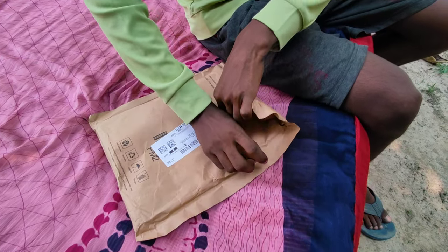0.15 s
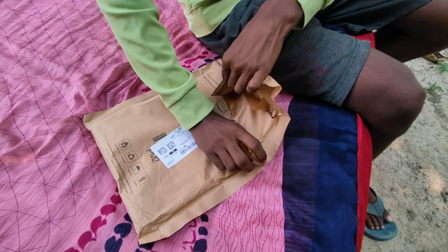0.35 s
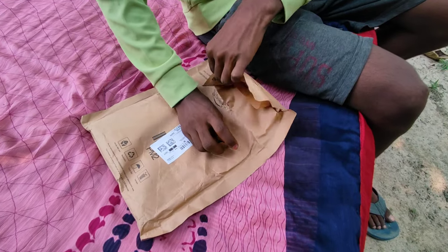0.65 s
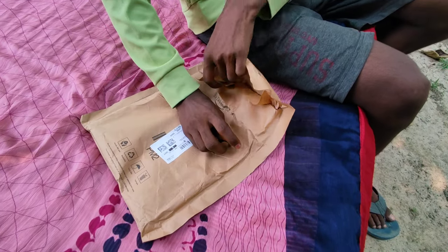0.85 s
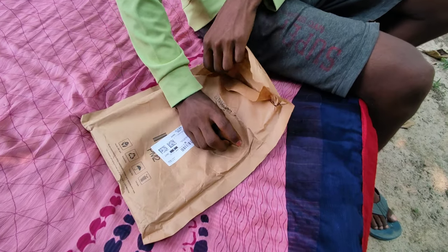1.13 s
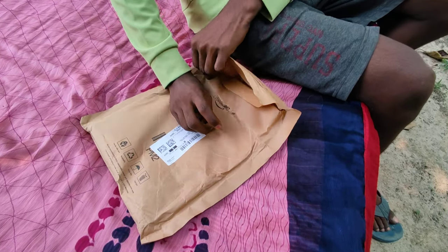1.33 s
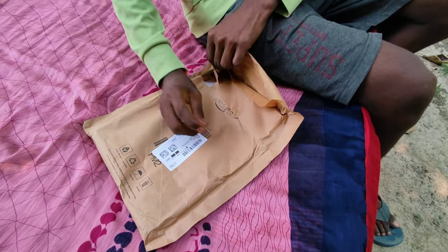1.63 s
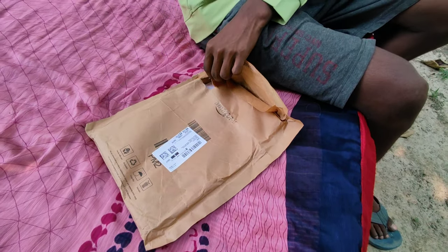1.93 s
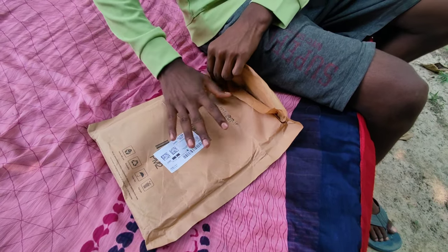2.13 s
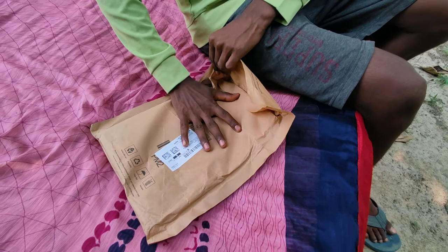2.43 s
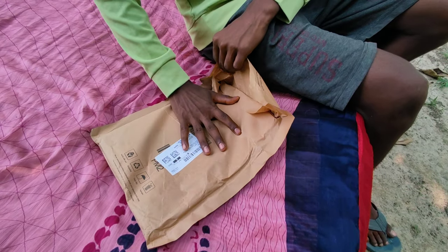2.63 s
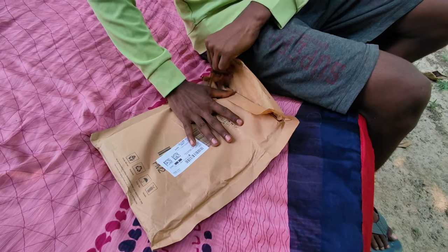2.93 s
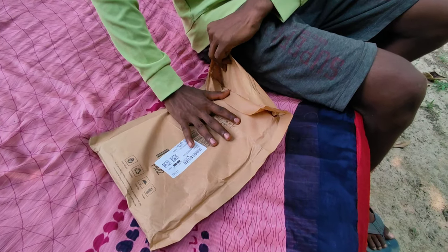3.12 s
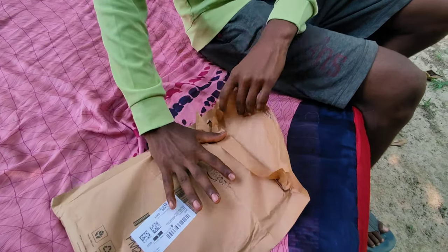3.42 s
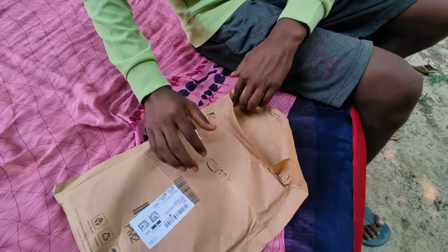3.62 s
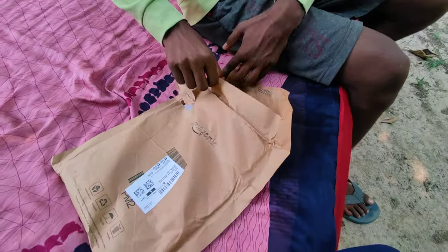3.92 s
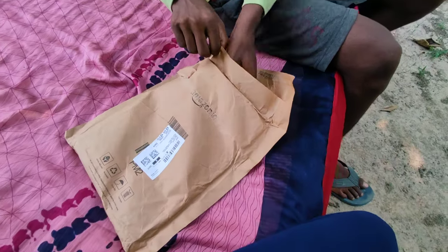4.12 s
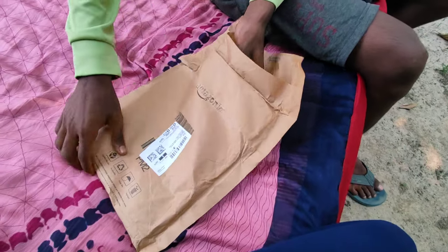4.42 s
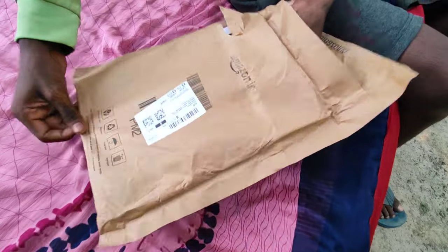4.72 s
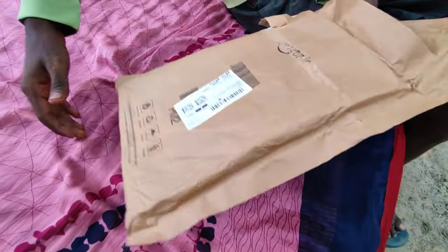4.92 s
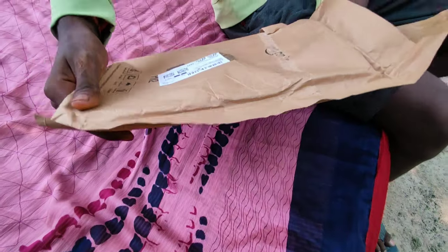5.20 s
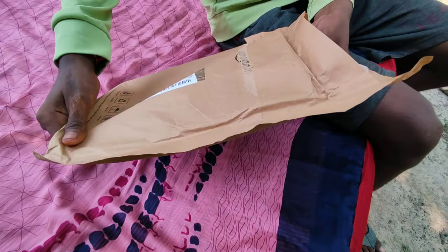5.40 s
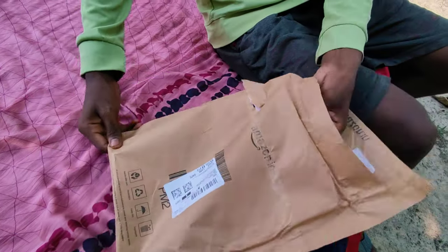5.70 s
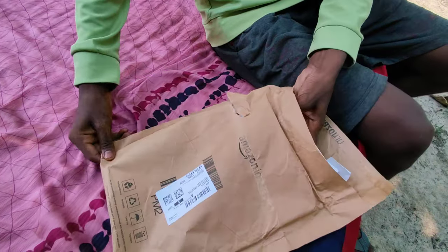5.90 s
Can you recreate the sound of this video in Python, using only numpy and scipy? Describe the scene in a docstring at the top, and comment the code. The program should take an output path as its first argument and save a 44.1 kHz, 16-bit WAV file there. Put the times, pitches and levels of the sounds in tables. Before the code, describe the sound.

Close stereo sound of a crisp paper envelope handled outdoors, over a very faint, steady low rumble. Light rubbing and small snaps start at once. From about 0.3 seconds the strip tears in short fibrous pulls, near 0.4, 0.75, 1.1 and 1.5 to 1.6, with a hollow drumming under the rips; the 1.1 pull is sharpest and ends in a bright tick. A last tiny tug comes near 1.7, then it is nearly quiet until about 2.25. Fingers press and rub the sheet from 2.3 to 3.4, crackling irregularly, with a firm snap and dull thump at 3.25. Creases cluster around 3.6, 4.0 and 4.3. From 4.6 to 5.7 the lifted paper rustles louder, in swishing strokes. At about 5.8 stiff card scrapes out harshly while the envelope flops with a soft low puff; a second scrape begins at 6.0 as it ends.

```python
"""Fingers rub crisp kraft paper over a faint outdoor rumble: an envelope is opened by hand on a blanket, close by.
Rubbing is dense random breaks in sheet and fibres; each crease snap is a short noise burst with a panel pitch.
The strip rips in four long pulls and a few short tugs: streams of fibre breaks, with the envelope drumming along.
Faces buckle with dull, ringing thumps as the paper is bent and lifted; one bright tick comes mid-rip.
At the end a card sleeve scrapes out in catches and slips, and the envelope flops down with a low puff of noise."""
import sys
import numpy as np
from scipy import signal
from scipy.fft import rfft, irfft, next_fast_len
from scipy.io import wavfile
from scipy.ndimage import uniform_filter1d

SR = 44100
rng = np.random.default_rng(int(sys.argv[2]) if len(sys.argv) > 2 else 0)


def master_out(mix):
    """Clip the mix to full scale and print it as 16-bit PCM to the path in sys.argv[1]."""
    frames = np.transpose(np.atleast_2d(mix))
    ceiling = np.clip(frames, -1, 1)
    pcm = np.round(ceiling * 32767).astype(np.int16)
    wavfile.write(sys.argv[1], SR, pcm)


N = 266849

# how the paper is bent, smooth when it slides:
# (time [s], spread of crackle sizes [dB], pitch of the gripped panel [Hz])
BENDING = [(0, 6, 2700), (1.85, 7, 2800), (2.42, 5, 2550), (2.58, 4, 1170), (3.05, 6.5, 1150),
           (3.4, -0.5, 2590), (3.58, 5.5, 1510), (4.33, 8, 1540), (4.75, 1.5, 2920), (5.42, 3.5, 2570),
           (5.7, 9, 2660)]
# strokes of the hands over the paper:
# (time [s], length [s], sheet level [dB], fibre hiss over the sheet [dB])
HAND_STROKES = [(0.0, 0.02, -47, 0.5), (0.076, 0.057, -54, -8), (0.172, 0.016, -56.5, 0.5),
                (0.592, 0.033, -52.5, -4), (0.99, 0.018, -47, -4), (1.311, 0.019, -51, -7.5),
                (2.299, 0.04, -56, -6.5), (2.402, 0.046, -46.5, 2), (2.546, 0.13, -49, -3),
                (2.74, 0.046, -51.5, -8.5), (2.903, 0.036, -49.5, -5.5), (2.978, 0.14, -50, 1.5),
                (3.171, 0.1, -49.5, 0), (3.314, 0.223, -55.5, 3), (3.578, 0.062, -47.5, -3.5),
                (3.928, 0.055, -48.5, 2), (4.048, 0.15, -54, -13), (4.455, 0.059, -50, -3.5),
                (4.572, 0.034, -50, -8), (4.685, 0.041, -46.5, -4.5), (4.779, 0.065, -39.5, -2),
                (4.889, 0.082, -49.5, -5), (5.106, 0.072, -45.5, -1.5), (5.199, 0.1, -47, -5),
                (5.347, 0.085, -41, -2.5), (5.401, 0.038, -40.5, -2), (5.554, 0.015, -45, -1.5),
                (5.707, 0.09, -44, -9.5)]
# faint creasing for as long as the hands hold the paper: (time [s], sheet level [dB])
GRIP_LEVEL = [(0, -69), (.53, -56.5), (.66, -68), (.94, -64), (1.3, -59.5), (1.85, -66), (2.0, -77),
              (2.24, -77), (2.47, -55), (2.72, -66), (3.3, -58), (3.79, -65.5), (3.95, -52.5),
              (4.38, -59.5), (4.9, -52.5), (5.035, -71), (5.3, -53.5), (5.63, -63.5)]
# bass of the sheet, as the palm presses it flat and it is then lifted off the blanket: (time [s], bass gain [dB])
BASS_GAIN = [(1.4, 7), (2.4, -3), (4.35, -0.5), (4.6, -2)]
# creases snapping through, before the trims in snaps(): (time [s], sheet level [dB], fibre tick level [dB])
CREASE_SNAPS = [(0.041, -53.5, -70), (0.092, -49.5, -50.5), (0.241, -47.5, -45.5), (0.466, -59, -39),
                (0.526, -58, -46.5), (0.538, -44.5, -47.5), (0.59, -47, -40.5), (0.606, -62, -50),
                (0.694, -52.5, -50.5), (0.881, -50, -44), (0.905, -48, -56.5), (1.0, -47, -42.5),
                (1.039, -42, -41.5), (1.147, -41.5, -43.5), (1.222, -49, -62.5), (1.252, -53, -54),
                (1.324, -49.5, -48.5), (1.347, -58, -52), (1.479, -45, -34.5), (1.599, -40.5, -43.5),
                (1.613, -46, -39), (1.631, -45, -50), (1.716, -63, -55), (1.83, -60.5, -64.5),
                (1.887, -57, -62), (2.25, -63.5, -70.5), (2.33, -54, -57.5), (2.569, -42.5, -64),
                (2.577, -44, -47.5), (2.64, -46, -48), (2.779, -48.5, -49.5), (2.818, -61, -45.5),
                (2.874, -53.5, -58), (2.928, -49.5, -45.5), (2.987, -46.5, -41.5), (3.039, -46.5, -66),
                (3.086, -54, -43.5), (3.11, -51.5, -51.5), (3.191, -47, -69), (3.243, -35.5, -42),
                (3.42, -46.5, -51), (3.554, -44, -40.5), (3.565, -46.5, -68), (3.585, -44, -52),
                (3.603, -44.5, -50), (3.627, -44, -38.5), (3.839, -51, -58), (3.867, -50.5, -58),
                (3.956, -42, -38), (3.991, -45, -39.5), (4.062, -45, -52), (4.086, -49, -70),
                (4.101, -66, -47), (4.125, -59, -55), (4.169, -53, -63), (4.23, -55, -58),
                (4.248, -57, -58), (4.263, -59, -48.5), (4.323, -43.5, -72), (4.337, -44.5, -39),
                (4.374, -54.5, -68), (4.41, -56, -53), (4.508, -56, -46), (4.61, -46.5, -47),
                (4.621, -45.5, -43.5), (4.938, -43.5, -40.5), (4.972, -56, -57), (4.999, -55, -59),
                (5.058, -53.5, -54), (5.148, -45, -36), (5.175, -53, -42), (5.21, -42, -47.5),
                (5.265, -45, -39), (5.396, -47, -39.5), (5.435, -42.5, -35), (5.483, -47.5, -67),
                (5.563, -51, -38), (5.692, -45, -54.5), (5.752, -45, -42), (5.765, -43, -40),
                (5.84, -36, -46), (5.971, -40.5, -59), (5.999, -45, -42.5)]
# pulls on the tear strip: (time at full force [s], build-up [s], length [s], level [dB], sag [dB per s])
STRIP_PULLS = [(0.372, 0.11, 0.099, -35, 45), (0.755, 0.061, 0.1, -35, 74), (1.11, 0.09, 0.016, -28.5, 98),
               (1.148, 0.038, 0.017, -40, 60), (1.476, 0.052, 0.073, -33, 19),
               (1.6, 0.092, 0.025, -32.5, 195.5), (1.718, 0.012, 0.011, -46.5, 100)]
# drumming of the envelope under the tear, gliding as its tension shifts: (time [s], pitch [Hz])
DRUM_PITCH = [(.33, 232), (.42, 306), (.46, 400), (.79, 259.5), (1.1, 370)]
# a whole face of the envelope buckling: (time [s], level before the mode levels [dB], pitch [Hz])
FACE_BUCKLES = [(0.537, -42, 340), (0.75, -40, 345), (0.983, -45, 209), (1.147, -38.5, 298.4),
                (3.242, -45, 326), (3.563, -48, 424), (4.181, -45.5, 360)]
# modes of that face: (multiple of its pitch [ratio], level [dB])
FACE_MODES = [(.48, -10), (1, 1.5), (1.37, -3.5)]
# drags of the card sleeve: (time at full speed [s], build-up [s], length [s], level [dB], sag [dB per s])
SLEEVE_DRAGS = [(5.84, 0.065, 0.079, -28, 70), (6.016, 0.052, .05, -29.5, 10)]
# the envelope comes down and pushes out air:
# (time at full level [s], build-up [s], length [s], level [dB], sag [dB per s])
ENVELOPE_FLOP = [(5.855, 0.053, 0.054, -37, 250)]

# colour of the open air: (frequency [Hz], relative level per Hz [dB])
AIR_COLOUR = [(26, -8), (95, -16.5), (250, -26), (800, -33.5), (16000, -64)]
# colour of rubbed and snapping paper: (frequency [Hz], relative level per Hz [dB])
PAPER_COLOUR = [(50, -35), (100, -8.5), (240, -3.5), (450, -1.5), (760, -5.5), (1100, -0.5), (2700, -2),
                (4700, -7), (10100, -1), (12300, -9.5), (16000, -16.5)]
# colour of the ripping strip: (frequency [Hz], relative level per Hz [dB])
RIP_COLOUR = [(53, -39), (90, -14.5), (165, -14), (323, -8), (570, -6.5), (839, -12), (935, -4.5),
              (1750, -6.5), (2430, 0), (4450, -9.5), (10100, -1), (11600, -8), (15000, -10), (16000, -16)]
# colour of card scraping in the hollow envelope: (frequency [Hz], relative level per Hz [dB])
SLEEVE_COLOUR = [(50, -42), (110, -7.5), (430, -7.5), (950, -3), (1400, 1), (1900, 2), (2800, -10.5),
                 (7100, -7.5), (8300, -18.5), (14000, -20.5), (16000, -40)]
# colour of the air puff: (frequency [Hz], relative level per Hz [dB])
PUFF_COLOUR = [(30, 12.5), (110, 1.5), (220, -9), (1500, -82)]
# likeness of the two microphones: (frequency [Hz], left-right correlation [0 to 1])
STEREO_LIKENESS = [(30, .76), (250, .95), (800, .88), (1400, .3), (4000, .07)]
# imbalance of the two microphone ports: (frequency [Hz], left minus right [dB])
PORT_BALANCE = [(900, 0), (1400, -2.2), (1800, -2.2), (2500, -5.5), (3300, -1.5), (4800, -.5), (6500, -3.5),
                (9500, -11), (12000, -.5)]

SPLIT_HZ = 4500  # where flexing sheet gives way to ticking fibres; also the highest facet pitch
TOP_HZ = 15800  # band limit of the microphones
FADE_DB = 30  # the depth over which build-up, rise, stop and fall times count
STROKE_RISE_S, STROKE_FALL_S = 0.046, 0.04
PULL_STOP_S, DRAG_STOP_S, FLOP_STOP_S = 0.028, 0.071, 0.44
GRIP_HISS_DB = -5.5  # fibre hiss over the sheet
# small, stiff panels snap brighter and higher: pitch at equal sheet and tick level, extra tick per octave up
PANEL_HZ, PANEL_DB_PER_OCTAVE = 2350, 21.5
DRUM_DB, DRUM_WIDTH_HZ = -20, 78  # level over the rip, width of the resonance
BUCKLE_RISE_S, BUCKLE_T60_S = 0.0011, 0.04


def amp(db):
    """Decibels to gain."""
    return 10 ** (np.asarray(db) / 20)


def unit(x):
    """Scale to rms 1."""
    return x / np.sqrt(np.mean(x ** 2) + 1e-20)


def along(points, hz):
    """Read (frequency, value) points on a log frequency axis."""
    f, v = np.transpose(points)
    return np.interp(np.log(hz + 1), np.log(f + 1), v)


def curves(rows):
    """One value per sample for each column after the time."""
    s, *cols = np.transpose(rows)
    return [np.interp(np.arange(N) / SR, s, c) for c in cols]


def filtered(x, gain):
    """Causal minimum-phase filter with the given gain at each frequency, one row per channel."""
    size = 8192 if x.shape[-1] > SR else 1024
    log_gain = np.log(np.maximum(gain(np.fft.rfftfreq(size, 1 / SR)), 1e-6))
    # folding the cepstrum onto positive times puts the energy as early as possible
    cepstrum = irfft(log_gain)
    cepstrum[..., 1:size // 2] *= 2
    cepstrum[..., size // 2 + 1:] = 0
    response = irfft(np.exp(rfft(cepstrum)))
    return signal.oaconvolve(x, response, axes=-1)[..., :x.shape[-1]]


def radiate(pair, colour, band=np.ones_like):
    """Two unrelated excitations become coloured left and right of rms 1, alike in the bass."""
    def mid_side_gain(hz):
        # the angle shares power between mid and side to give the wanted correlation
        angle = np.arccos(np.clip(along(STEREO_LIKENESS, hz), 0, .99)) / 2
        return amp(along(colour, hz)) * band(hz) * [np.cos(angle), np.sin(angle)]
    mid, side = filtered(pair, mid_side_gain)
    return unit(np.array([mid + side, mid - side]))


def sheet(hz):
    """The low range, where the whole sheet flexes."""
    return 1 / np.sqrt(1 + (hz / SPLIT_HZ) ** 8)


def fibres(hz):
    """The high range, where single fibres tick."""
    return np.sqrt(1 - sheet(hz) ** 2)


def fractures(rate, spread_db, cap=2.2):
    """Energy of tiny random breaks, rate per second: many small and a few large, steady on average."""
    chance = rng.random(N)
    size = np.minimum(rng.standard_normal(N), cap)
    energy = (chance < rate / SR) * amp(spread_db * size) ** 2
    return energy / (np.abs(uniform_filter1d(energy, size=2205)) + 1e-9)  # 50 ms average


def crackle(energy, life, rub):
    """Each break is a noise burst that swells and dies within a few lives [s], over a share of smooth rubbing."""
    t = np.arange(SR // 20) / SR
    fade = t * np.exp(-t / life)
    power = np.abs(signal.fftconvolve(energy, fade / fade.sum())[:N])
    return np.sqrt(power + rub) * rng.standard_normal((2, N))


def pops(energy, life):
    """Each break plucks a small facet that rings briefly at its own pitch, fading by its life [s]."""
    t = np.arange(SR // 100) / SR
    start = np.flatnonzero(energy)
    pitch, mid_phase, side_phase = rng.random((len(start), 3)).T[..., None]
    fade = np.sqrt(energy[start, None]) * t * np.exp(-t / life)
    index = (start[:, None] + np.arange(len(t))).ravel()

    def ringing(phase):
        ring = fade * np.sin(2 * np.pi * (SPLIT_HZ * pitch * t + phase))
        return np.bincount(index, ring.ravel(), N)[:N]
    return unit(np.array([ringing(mid_phase), ringing(side_phase)]))


def flexing(pair, patchy_db, panel_hz=None, panel_db=5, width=0.14):
    """Bending paper keeps shifting its resonances; the gripped panel adds a broad one."""
    hz, t, z = signal.stft(pair, SR, nperseg=512)
    field = uniform_filter1d(rng.standard_normal(z.shape[1:]), size=5, axis=0)
    field = uniform_filter1d(field, size=7, axis=1)
    # the patchiness weakens toward the treble
    gain = amp(patchy_db * unit(field) / np.hypot(1, hz[:, None] / 9000))
    if panel_hz is not None:
        panel_now = np.interp(t, np.arange(N) / SR, panel_hz)
        away = np.log((hz[:, None] + 1) / panel_now) / width
        gain = gain * amp(panel_db * np.exp(-away ** 2 / 2))
    return signal.istft(z * gain, nperseg=512)[1][:, :N]


def gesture(start, rise, length, level_db, sag, fall):
    """Power of one movement: it builds up to its start, sags while it lasts and then dies away."""
    age = np.arange(N) / SR - start
    live = (age > -2 * rise) & (age < length + 2 * fall)
    age, power = age[live], np.zeros(N)
    faded = np.maximum(-age, 0) / rise + np.maximum(age - length, 0) / fall
    power[live] = amp(level_db - sag * np.clip(age, 0, length) - FADE_DB * faded) ** 2
    return power


def gestures(rows, fall):
    """Gain of a series of movements that all stop alike."""
    return np.sqrt(sum(gesture(*row, fall) for row in rows))


def outdoors(level_db=-66):
    """Quiet open air: steady coloured noise heard as a low, even rumble."""
    return amp(level_db) * radiate(rng.standard_normal((2, N)), AIR_COLOUR)


def handling():
    """Gains of the flexing sheet and of its fibre hiss: strokes on top of a lasting grip."""
    flex = amp(curves(GRIP_LEVEL)[0]) ** 2
    hiss = flex * amp(GRIP_HISS_DB) ** 2
    for s, length, level_db, hiss_db in HAND_STROKES:
        power = gesture(s, STROKE_RISE_S, length, level_db, 0, STROKE_FALL_S)
        flex = flex + power
        hiss = hiss + power * amp(hiss_db) ** 2
    return np.sqrt(flex), np.sqrt(hiss)


def rustle(bass_hz=550):
    """Wrinkles give way under the fingers: facets of the sheet pop, fibres tick and rub."""
    sheet_gain, hiss_gain = handling()
    spread_db, panel_hz = curves(BENDING)
    wrinkles = fractures(rate=560, spread_db=spread_db)
    ticks = fractures(rate=300, spread_db=spread_db, cap=2.3)
    slide = 1.7 * amp(-2 * spread_db)  # even motion rubs more and cracks less
    facets = .75 * pops(wrinkles, life=.0003) + crackle(wrinkles, life=.0005, rub=2 * slide)
    hiss = crackle((wrinkles + ticks) / 2, life=.0003, rub=slide)
    low = radiate(flexing(facets, patchy_db=2, panel_hz=panel_hz), PAPER_COLOUR, sheet)
    high = radiate(flexing(hiss, patchy_db=4.0), PAPER_COLOUR, fibres)
    bass_db, = curves(BASS_GAIN)
    bass = signal.sosfiltfilt(signal.butter(2, bass_hz, fs=SR, output="sos"), low)
    low_shaped = low + (amp(bass_db) - 1) * bass
    return sheet_gain * low_shaped + hiss_gain * high


def burst(t, life, tail_db, tail_life):
    """A crease gives way in one main crack, with small ones close around it, then shivers."""
    offsets = np.append(0, rng.uniform(-.003, .004, 3))[:, None]
    sizes = np.append(1, rng.uniform(.1, .5, 3))[:, None]
    age = t - offsets
    # each crack rises twice as fast as it dies
    cracks = np.sum((sizes * np.exp(np.minimum(2 * age, -age) / life)) ** 2, axis=0)
    shiver = (t > 0) * (amp(tail_db) * np.exp(-np.abs(t) / tail_life)) ** 2
    return np.sqrt(cracks + shiver) * rng.standard_normal((2, len(t)))


def snaps(sheet_db=-4.5, tick_db=-6.0, ring=1.57, width_hz=400):
    """Each crease pops a panel of its own pitch and cracks the fibres along the fold."""
    t = np.arange(-SR // 200, SR // 30) / SR
    out = np.zeros((2, N + len(t)))
    for s, pop_db, crack_db in CREASE_SNAPS:
        panel_hz = PANEL_HZ * 2 ** ((crack_db - pop_db) / PANEL_DB_PER_OCTAVE)

        def panel(hz):
            return sheet(hz) * (1 + ring / (1 + ((hz - panel_hz) / width_hz) ** 2))
        pop = radiate(burst(t, life=.001, tail_db=-13, tail_life=.0045), PAPER_COLOUR, panel)
        tick = radiate(burst(t, life=.00075, tail_db=-18, tail_life=.003), PAPER_COLOUR, fibres)
        snap = amp(pop_db + sheet_db) * pop + amp(crack_db + tick_db) * tick
        out[:, round((s + t[0]) * SR):][:, :len(t)] += snap
    return out[:, :N]


def drumming():
    """The taut face of the envelope, shaken by the tear, rings in one narrow gliding resonance."""
    phase = 2 * np.pi * np.cumsum(curves(DRUM_PITCH)[0]) / SR
    lowpass = signal.butter(2, DRUM_WIDTH_HZ / 2, fs=SR, output="sos")
    shake = signal.sosfilt(lowpass, rng.standard_normal((2, N)))
    return amp(DRUM_DB) * unit(shake[0] * np.cos(phase) + shake[1] * np.sin(phase))


def tear(plucks_db=-6):
    """Fibres break in a dense stream while the strip is pulled, and the envelope drums along."""
    cracks = crackle(fractures(rate=2000, spread_db=4.5), life=.00018, rub=.22)
    plucks = pops(fractures(rate=900, spread_db=3.5), life=0.00048)
    rip = radiate(flexing(cracks + amp(plucks_db) * plucks, patchy_db=1.5), RIP_COLOUR)
    return gestures(STRIP_PULLS, PULL_STOP_S) * (rip + drumming())


def buckles():
    """A face flips through with a dull thump; its low modes ring briefly, alike in both microphones."""
    t = np.arange(SR // 10) / SR
    out = np.zeros(N + len(t))
    for s, level_db, hz in FACE_BUCKLES:
        ring = sum(amp(db) * np.sin(2 * np.pi * (multiple * hz * t + rng.random()))
                   for multiple, db in FACE_MODES)
        envelope = amp(level_db - 60 * t / BUCKLE_T60_S) * (1 - np.exp(-t / BUCKLE_RISE_S))
        out[round(s * SR):][:len(t)] += envelope * ring
    return out[:N]


def strip_jerk():
    """As the third pull dies away, a taut fibre bundle parts with one bright, quickly damped tick."""
    s, peak_db, ring_hz, life = 1.146, -16, 10000, .00022  # time [s], envelope peak, pitch, life [s]
    age = np.clip(np.arange(N) / SR - s, 0, 20 * life) / life
    return amp(peak_db) * age * np.exp(1 - age) * np.sin(2 * np.pi * ring_hz * life * age)


def card_sleeve(right_db=0.1):
    """Stiff card catches and slips inside the hollow envelope, slightly right of centre."""
    slips = crackle(fractures(rate=900, spread_db=5.5), life=0.00073, rub=0.18)
    scrape = radiate(flexing(slips, patchy_db=2.0), SLEEVE_COLOUR)
    return gestures(SLEEVE_DRAGS, DRAG_STOP_S) * scrape * amp([[-right_db], [right_db]])


def flop():
    """The envelope lands and pushes out air: a low puff of noise that lingers."""
    return gestures(ENVELOPE_FLOP, FLOP_STOP_S) * radiate(rng.standard_normal((2, N)), PUFF_COLOUR)


def surroundings(x, wet_db=-19, t60=0.018):
    """Body and ground scatter a brief, weak echo."""
    t = np.arange(SR // 10) / SR
    tail = rng.standard_normal((2, len(t))) * amp(-60 * t / t60) * (t > .003)
    echo = signal.fftconvolve(x, tail / np.linalg.norm(tail[0]), axes=1)[:, :N]
    return x + amp(wet_db) * echo


def scene():
    """All the paper sounds with their echo, in the open air."""
    paper = rustle() + snaps() + tear() + buckles() + strip_jerk()
    return outdoors() + surroundings(paper + card_sleeve() + flop())


def record(dry):
    """The right microphone port resonates in two bands; nothing passes the band limit."""
    def microphones(hz):
        lean = amp(along(PORT_BALANCE, hz) / 2)
        return np.array([lean, 1 / lean]) / np.sqrt((lean ** 2 + lean ** -2) / 2)  # total power kept
    size = next_fast_len(N + SR // 2)
    spectrum = rfft(filtered(dry, microphones), size)
    passed = np.fft.rfftfreq(size, 1 / SR) < TOP_HZ
    return irfft(spectrum * passed, size)[:, :N]


dry = scene()
out = record(dry)
master_out(out)
```